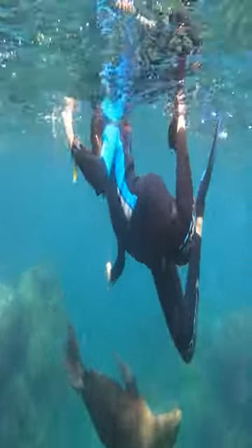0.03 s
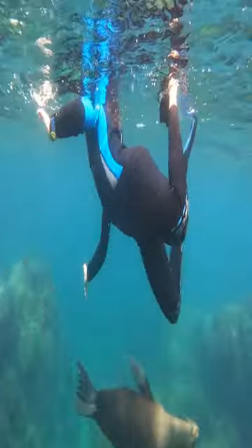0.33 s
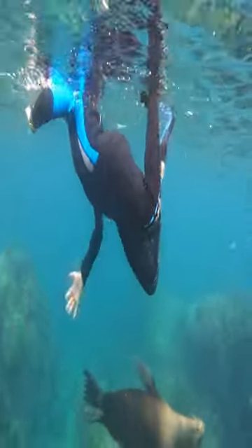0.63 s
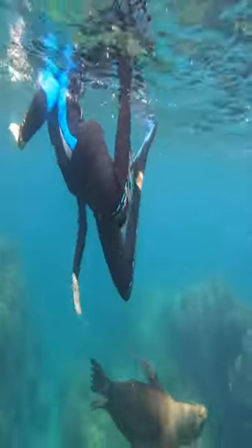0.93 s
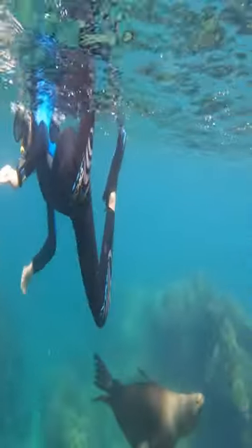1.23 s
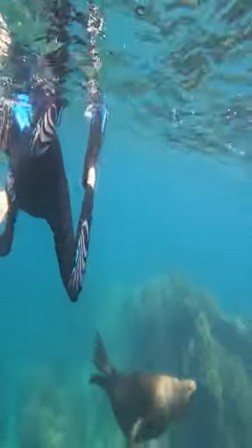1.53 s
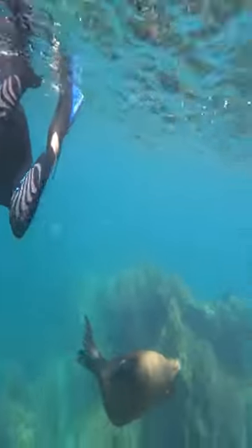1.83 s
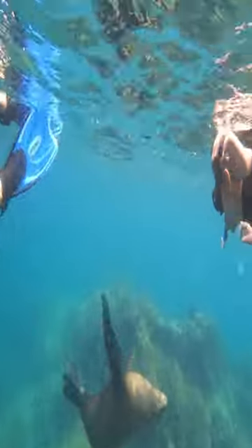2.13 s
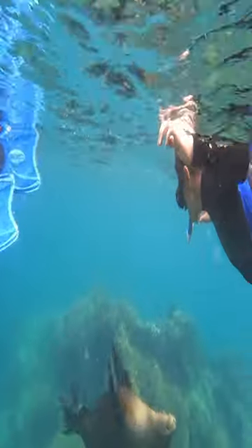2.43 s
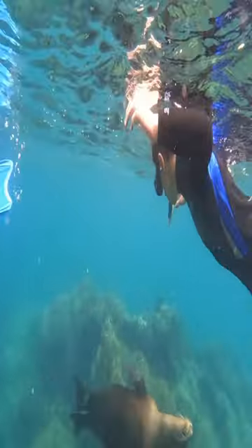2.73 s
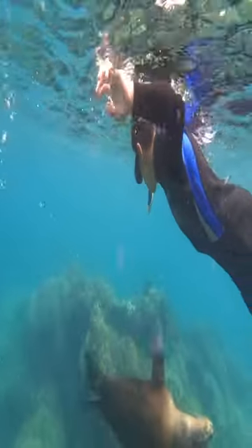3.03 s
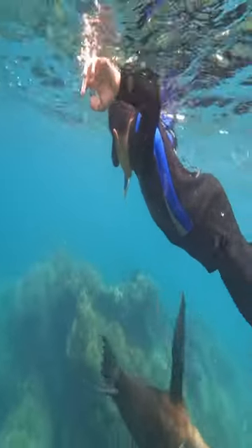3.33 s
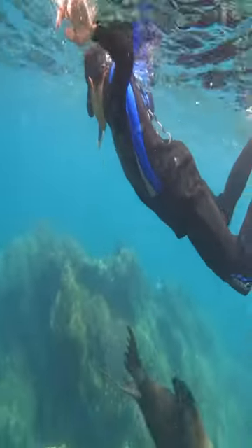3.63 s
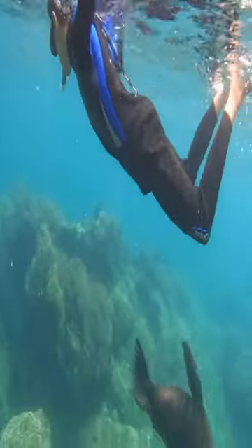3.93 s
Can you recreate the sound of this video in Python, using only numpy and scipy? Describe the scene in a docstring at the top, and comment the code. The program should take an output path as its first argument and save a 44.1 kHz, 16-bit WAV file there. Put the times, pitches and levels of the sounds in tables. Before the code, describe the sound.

Snapping shrimp crackle densely throughout, heard underwater through a waterproof case, each sharp click ringing very briefly. Water rumbles and gurgles softly underneath. Near 0.7 seconds come a soft gulp of air and tiny bubbles. From about 2 seconds, passing swimmers stir up more gurgling, small bubble streams and faint low thumps. Bubbling swells around 3.6 seconds, and the deep rumble is strongest just before 4 seconds.

```python
"""A camera in a waterproof case drifts just under the sea surface above a rocky reef.
From the start, snapping shrimp crackle all around, each snap ringing briefly in the case,
while water sways and gurgles against it. Near 0.7 s trapped air gulps softly and tiny bubbles sing.
From about 2 s, passing swimmers stir the water more, and their hands and fins drag streams of
bubbles under. The water pushes hardest just before the end, at 4 s."""
import sys
import numpy as np
from scipy import signal
from scipy.fft import rfft, irfft, next_fast_len
from scipy.io import wavfile

SR = 44100
rng = np.random.default_rng(int(sys.argv[2]) if len(sys.argv) > 2 else 0)


def unload_audio(sound):
    """Save the sound as a 16-bit wav file, at the path given as the first command line argument."""
    columns = np.transpose(np.atleast_2d(sound))
    # keep every value between -1 and 1, then stretch to whole-number steps
    steps = np.round(np.clip(columns, -1, 1) * 32767)
    wavfile.write(sys.argv[1], SR, steps.astype(np.int16))


N = 176400

# Snaps of nearby shrimp, before the case colours them: start_s, level_db, extra_body_db, extra_edge_db
NEAR_SNAPS = [(0.0082, -29, 14.5, 0), (0.0769, -23, 0, -1), (0.0926, -30.5, -12, -3),
              (0.1491, -32, -0.5, -16), (0.1922, -23.5, -5.5, 0), (0.1979, -28, -7, 4),
              (0.215, -31.5, 2.5, 5), (0.244, -32.5, 9, 9.5), (0.309, -27, -13, -15), (0.355, -28, 5, -4),
              (0.3575, -25, -4, -21), (0.4226, -33.5, 1, -17), (0.427, -26.5, 4, -9.5),
              (0.4971, -28, -3, 6), (0.508, -31.5, 1, 7), (0.5252, -27, -4, -4),
              (0.5644, -24.5, -0.5, -4.5), (0.5708, -23.5, -17, -15), (0.5965, -26.5, -8.5, 5),
              (0.6344, -24.5, -2, -11), (0.6428, -24.5, -2, -20), (0.6665, -27.5, -3, -11),
              (0.6755, -25.5, -4, -5), (0.7623, -29, -2.5, -4), (0.7706, -31.5, -1, 10),
              (0.8185, -23.5, -7.5, -7), (0.9324, -32.5, 5, 8.5), (0.9698, -28, -18, -8),
              (0.9777, -30, -1.5, 5.5), (1.0, -23.5, 3, 1), (1.0439, -23, -10, -17),
              (1.0535, -20, -13, -18), (1.0694, -23, 0.5, 1), (1.081, -23, -6, -21),
              (1.1084, -18.5, -9, -15), (1.1839, -22, 5, -1.5), (1.1894, -20.5, -2.5, -2),
              (1.2076, -20, -6, -14), (1.2242, -27, -7, -6), (1.2718, -22.5, -36, -27),
              (1.3313, -35, 7.5, 2), (1.3566, -24, -16, -8), (1.3715, -28, 0, 4), (1.3851, -22.5, -4, -7),
              (1.4022, -24.5, -6.5, -17), (1.4096, -19, -7, -11), (1.4574, -26, -13, -7),
              (1.4698, -19, -1.5, -1), (1.4804, -30, 12.5, -3), (1.5193, -25, 6, -0.5),
              (1.5506, -20, -11, -19), (1.559, -20, -5, -7), (1.5653, -27.5, 10, 8), (1.5764, -23.5, 8, 0),
              (1.6407, -31, 7.5, -9), (1.6522, -22.5, -1.5, -6), (1.6555, -31.5, 7.5, 10),
              (1.6583, -30.5, 3, -7), (1.6724, -25.5, -33, -3), (1.686, -23.5, 5.5, 1.5),
              (1.712, -23, 3.5, -4), (1.7657, -36, 11, -3), (1.7835, -29, -1, 0), (1.7941, -28.5, 3, 8),
              (1.8183, -19, -4.5, -15), (1.8296, -24, 5, 0.5), (1.838, -22, -9.5, -12),
              (1.8878, -27, -3, -12), (1.931, -20.5, 0.5, -9), (1.9937, -23, -18, -11),
              (2.0103, -22, -1, -2.5), (2.0262, -21.5, -9.5, -8), (2.0379, -16.5, -24, -14),
              (2.085, -20.5, -28, -7.5), (2.1411, -36, 11, -15), (2.1996, -28.5, 3, -5),
              (2.2103, -22.5, -1, -4.5), (2.2472, -34.5, 3.5, 5.5), (2.316, -25.5, -5.5, -1.5),
              (2.319, -31.5, -8, -13), (2.3233, -24, -1.5, -12), (2.3607, -26.5, -5, 1),
              (2.3753, -18.5, -18, -12), (2.4292, -24, -26, -11), (2.4833, -26, -3.5, 2.5),
              (2.5249, -27, -7, 4.5), (2.532, -23.5, -8, -5), (2.57, -24.5, 5.5, -8),
              (2.5949, -20, 1, -4.5), (2.6674, -23, -20, -2), (2.674, -40, -13, 6),
              (2.6844, -26, -0.5, -0.5), (2.6878, -31.5, 6.5, -5), (2.7406, -29, -3, 7.5),
              (2.7652, -26, 4.5, 7), (2.793, -17, -5, -26), (2.8019, -20, -2.5, -10.5),
              (2.8563, -22, -1, -2), (2.8861, -24.5, -6.5, -5), (2.9119, -25.5, 5, -6),
              (2.945, -35.5, 8.5, -1), (2.9555, -21, -3.5, -4), (3.0372, -28.5, -4.5, -12),
              (3.1256, -23, -3, -11), (3.1488, -39.5, -4, 16), (3.1764, -22, -5, 1.5),
              (3.321, -22.5, -7, -31), (3.36, -27.5, -4, 0), (3.377, -28.5, 13.5, -0.5),
              (3.5159, -29, -2, 0), (3.5346, -34.5, 1, 3), (3.548, -25, 1, -3.5), (3.61, -28, -1, -3),
              (3.6216, -27.5, 9, 1), (3.6275, -26.5, -3, 7), (3.6448, -32, 2, 0), (3.653, -30, 8, 5.5),
              (3.666, -25.5, -6, -7), (3.7143, -28, -4.5, 0.5), (3.7661, -40, 13.5, 4), (3.7857, -32, 3, 3),
              (3.8089, -26.5, 12.5, 0.5), (3.8367, -20.5, -11, -28), (3.8755, -21.5, -11.5, -12),
              (3.9187, -28, 0.5, -4), (3.948, -21.5, -11.5, -29), (3.9791, -26.5, 4, -2),
              (3.9854, -30.5, 13, 4)]
# How the far shrimp grow louder: time_s, gain_db
CROWD_GAIN = [(.7, -1.5), (2.3, 0.5)]
# Tones the case rings at: pitch_hz, width_hz, gain_db, left_over_right_db, left_lead_radians
CASE_TONES = [(660, 120, -17, -3.5, 0.9), (1099, 97, -15, -23.5, -2.8), (1385, 124, 1, 5.5, -0.86),
              (1598, 225, 7, -1.5, 0.44), (1836, 460, -8.5, 24, -2.8), (2554, 646, 8, 1.5, -0.85),
              (3903, 512, 8, 2, 0.81), (4920, 650, 6.5, -4, -0.16), (6003, 250, -1, -3.5, -0.68),
              (6785, 1250, 0, -1, 0.31), (11400, 7800, -23, -1, -0.3)]
# How much of the crackle differs between the two microphones: frequency_hz, share_0_to_1
STEREO_SHARE = [(700, 0.67), (1200, 0.08), (5000, 0.02), (9000, 0.16), (14000, 0.22)]
# Water pushing on the case, before SWAY_BOOST_DB is added: time_s, level_db
SWAY_LEVEL = [(.55, -48.5), (.7, -46.5), (1.6, -49.5), (2.2, -39.5), (3.45, -40), (3.75, -41),
              (3.88, -27.5)]
# The deep tone of that push: frequency_hz, gain_db
SWAY_COLOUR = [(5, -19.5), (10, 3.5), (35, -15), (60, -22.5), (100, -46), (200, -75), (1000, -110)]
# Loudness of the gurgling water: time_s, level_db
GURGLE_LEVEL = [(0, -56), (.6, -53.5), (1.1, -54.5), (1.95, -61.5), (2.3, -47.5), (2.6, -52.5), (3.0, -56),
                (3.35, -52), (3.6, -47), (3.85, -47.5), (4, -51)]
# Balance of low and high in the gurgle: frequency_hz, gain_db
GURGLE_COLOUR = [(50, 9.5), (100, -3), (170, 2.5), (290, -8), (450, -16.5), (700, -21.5), (1000, -58),
                 (2000, -24)]
# Loudness of the small bubbles that swimmers stir up: time_s, level_db
BUBBLE_LEVEL = [(0, -70), (.7, -48.5), (1.5, -70), (2.1, -60), (2.3, -54.5), (2.7, -63), (3.1, -55),
                (3.42, -58), (3.7, -45.5), (4, -54.5)]
# How strong those bubbles are compared with each other: pitch_hz, gain_db
BUBBLE_STRENGTH = [(170, -3), (280, -6.5), (570, -8.5), (850, -14), (1150, -13), (1550, 15.5), (1900, 19)]
# Gulps of trapped air: start_s, pitch_hz, peak_db, time_to_peak_s
AIR_GULPS = [(0.626, 447, -30.5, 0.001), (.665, 35.2, -29, 0.0058), (.735, 90, -40, 0.0087),
             (0.877, 175, -37.5, 0.0098), (1.3318, 1443, -19.5, 0.0015), (2.049, 90, -40, 0.017),
             (2.165, 165, -26, 0.0018), (2.171, 367, -39.5, 0.012), (2.186, 144, -24, 0.0032),
             (2.190, 248, -29, 0.0035), (3.150, 208, -44.5, 0.0095), (3.256, 87.5, -35, 0.01),
             (3.380, 244, -38, 0.0055), (3.560, 49.4, -19.5, 0.0046), (3.564, 260, -39, 0.0019),
             (3.572, 99, -32, 0.0075), (3.855, 88, -30, 0.011)]
# Bubble streams dragged under by hands and fins: start_s, length_s, pitch_hz, level_db
BUBBLE_STREAMS = [(2.268, .07, 1085, -55), (2.69, .07, 216, -51.5), (2.964, 0.18, 1620, -45.5),
                  (3.018, 0.084, 567, -61), (3.367, 0.083, 275, -49), (3.456, 0.35, 265, -51),
                  (3.56, 0.059, 565, -58)]
# The body, middle, edge and tip of a snap's sound: low_hz, high_hz
SNAP_BANDS = [(1200, 3200), (3200, 5600), (5600, 9000), (9000, 16000)]

CLUSTER_DB, CLUSTER_PEAK_S, CLUSTER_FADE_S = -16, .00055, .00053
REEF_TAIL_DB, REEF_FADE_S = -23, .0035
ECHO_DB, ECHO_RANGE_DB, ECHO_LATEST_S = -13, 8, .016
FAR_SNAPS_PER_S, FAR_DB, HISS_DB = 200, -34.5, -44.5
SWAY_BOOST_DB = 7


def from_db(db):
    """Turn decibels into a number to multiply by."""
    return 10 ** (np.asarray(db) / 20)


def unit_level(x):
    """Scale each row so its average (rms) level is 1."""
    return x / np.sqrt(np.mean(x ** 2, axis=-1, keepdims=True) + 1e-20)


def over_time(rows):
    """Join (time, value) points into a value for every sample."""
    return np.interp(np.arange(N) / SR, *np.transpose(rows))


def at_hz(points, hz):
    """Read between (frequency, value) points, with octaves evenly spaced."""
    f, value = np.transpose(points)
    return np.interp(np.log(np.maximum(hz, 1)), np.log(f), value)


def cut(x, hz, kind, order=2):
    """Keep only the chosen range of frequencies."""
    return signal.sosfilt(signal.butter(order, hz, kind, fs=SR, output="sos"), x)


def drift(hz, step=40):
    """A smooth random wobble, about 1 in size."""
    memory = np.exp(-2 * np.pi * hz * step / SR)
    noise = rng.standard_normal(N // step + 2002)
    slow = signal.lfilter([1], [1, -2 * memory, memory * memory], noise)[2000:]
    return np.interp(np.arange(N) / step, np.arange(len(slow)), unit_level(slow))


def quickest_filter(gain, size):
    """The fastest-responding filter with this gain at each frequency."""
    cepstrum = irfft(np.log(gain + 1e-9), size)
    cepstrum[1:size // 2] *= 2
    cepstrum[size // 2 + 1:] = 0
    return np.exp(rfft(cepstrum))


def add(track, start_s, sound):
    """Mix a sound in at its start time."""
    i = int(np.clip(start_s * SR, 0, N - 1))
    track[i:i + len(sound)] += sound[:N - i]


def snaps(rows, tip_db=-2, tip_spread_db=3, size=512):
    """Each snap is a sharp click, a tight cluster of later arrivals and a faint tail from the reef."""
    starts, db, body_db, edge_db = np.transpose(rows)
    t = (np.arange(size) - 10) / SR
    cluster = from_db(CLUSTER_DB) * np.exp(-abs(t - CLUSTER_PEAK_S) / CLUSTER_FADE_S)
    tail = from_db(REEF_TAIL_DB) * np.exp(-t / REEF_FADE_S)
    noise = rng.standard_normal((len(starts), size))
    spectra = rfft((t == 0) + noise * (cluster + tail) * (t > 0))
    # Set four bands to give each snap its own tone.
    f = np.arange(size // 2 + 1) * SR / size
    sparkle_db = tip_db + edge_db / 2 + tip_spread_db * rng.standard_normal(len(starts))
    wanted_db = np.array([db + body_db, db, db + edge_db, db + sparkle_db])
    power = [np.mean(abs(spectra[:, (f > low) & (f < high)]) ** 2, axis=1) for low, high in SNAP_BANDS]
    gains_db = wanted_db - 10 * np.log10(power) + 10 * np.log10(size)
    centres_hz = np.mean(SNAP_BANDS, axis=1)
    out = np.zeros(N)
    for start_s, spectrum, gain_db in zip(starts, spectra, gains_db.T):
        add(out, start_s, irfft(spectrum * from_db(np.interp(f, centres_hz, gain_db))))
    return out


def shrimp(farthest=5.5, tone_spread_db=2):
    """Near snaps echo once off surface or rocks; far ones are fainter, and the farthest blur into hiss."""
    lag, loss = rng.random((len(NEAR_SNAPS), 2)).T
    echoes = np.array(NEAR_SNAPS)
    echoes[:, 0] += ECHO_LATEST_S * lag
    echoes[:, 1] += ECHO_DB - ECHO_RANGE_DB * loss
    count = int(FAR_SNAPS_PER_S * N / SR)
    when, where = rng.random((count, 2)).T
    distance = 1 + (farthest - 1) * where  # the closest of the far shrimp is at 1
    body_db, edge_db = tone_spread_db * rng.standard_normal((count, 2)).T
    far = np.transpose([when * N / SR, FAR_DB - 20 * np.log10(distance), body_db - 1, edge_db + 1.5])
    paths = []
    for _ in range(2):  # the sound arrives by two sets of paths
        near = snaps(NEAR_SNAPS, tip_db=-1.5) + snaps(echoes)
        crowd = snaps(far) + from_db(HISS_DB) * rng.standard_normal(N)
        paths.append(near + crowd * from_db(over_time(CROWD_GAIN)))
    return np.array(paths)


def ringing_case(pressure, dull_above_hz=12400):
    """The case rings at broad tones; each reaches the two microphones with its own balance and timing."""
    size = 2 * next_fast_len(N // 2 + SR // 20)
    f = np.maximum(np.arange(size // 2 + 1) * SR / size, 1)
    sides = np.array([[1], [-1]])  # left, right
    shared, differing = rfft(pressure, size)
    share = np.clip(at_hz(STEREO_SHARE, f), 0, 1)
    arriving = np.sqrt(1 - share) * shared + np.sqrt(share) * differing * sides
    tones = 0
    for hz, width_hz, db, pan_db, lead in CASE_TONES:
        at_microphones = from_db(db + sides * pan_db / 2) * np.exp(.5j * sides * lead)
        tones += at_microphones / (1 + (hz / width_hz * (f / hz - hz / f)) ** 2)
    gain = abs(tones).mean(axis=0)
    ringing = irfft(arriving * tones / gain * quickest_filter(gain, size), size)[:, :N]
    return cut(ringing, dull_above_hz, "low", order=4)


def sway(side_db=-17):
    """Water pushes slowly back and forth on the case, making a deep rumble."""
    f = np.arange(N // 2 + 1) * SR / N
    spectrum = rfft(rng.standard_normal((2, N))) * from_db(at_hz(SWAY_COLOUR, f))
    middle, side = unit_level(irfft(spectrum, N))
    stereo = middle + from_db(side_db) * side * [[1], [-1]]
    return stereo * from_db(over_time(SWAY_LEVEL) + SWAY_BOOST_DB)


def gurgle(bands=11, side_db=-18, flicker_db=4, flicker_hz=12.8):
    """Stirred water gurgles: narrow bands of noise swell and fade on their own."""
    out, edges_hz = 0, np.geomspace(50, 2000, bands + 1)
    for low, high in zip(edges_hz, edges_hz[1:]):
        middle, side = cut(rng.standard_normal((2, N)), [low, high], "band")
        gain = from_db(at_hz(GURGLE_COLOUR, np.sqrt(low * high)) + flicker_db * drift(flicker_hz))
        out += gain * (middle + from_db(side_db) * side * [[1], [-1]])
    return unit_level(out) * from_db(over_time(GURGLE_LEVEL))


def bubble_cloud(per_s=320, spread_db=1, cycles_to_peak=3.4):
    """Swimmers stir the surface close by, and small bubbles sing at random pitches."""
    count = int(per_s * N / SR)
    when, pitch = rng.random((count, 2)).T
    lowest, highest = BUBBLE_STRENGTH[0][0], BUBBLE_STRENGTH[-1][0]
    hz = lowest * (highest / lowest) ** pitch
    db = at_hz(BUBBLE_STRENGTH, hz) + spread_db * rng.standard_normal(count)
    cloud = air_pockets(zip(when * N / SR, hz, db, cycles_to_peak / hz))
    return unit_level(cloud) * from_db(over_time(BUBBLE_LEVEL))


def air_pockets(rows, rise_share_per_s=.85):
    """Each pocket of air rings: its note swells, rises a little in pitch and dies away."""
    out = np.zeros(N)
    for start_s, hz, db, peak_s in rows:
        t = np.arange(int(10 * peak_s * SR)) / SR
        swell = t / peak_s * np.exp(1 - t / peak_s)
        note = np.sin(2 * np.pi * hz * t * (1 + rise_share_per_s * t / 2))
        add(out, start_s, from_db(db) * swell * note)
    return out


def bubble_streams(count=24, rise_share=.065, spread_share=.069, cycles_to_peak=2.74):
    """Bubbles of nearly one size follow closely and merge into a wavering, slightly rising note."""
    out = np.zeros(N)
    for start_s, length_s, hz, db in BUBBLE_STREAMS:
        along = (np.arange(count) + rng.random(count)) / count
        pitch_hz = hz * np.exp(rise_share * (along - .5) + spread_share * rng.standard_normal(count))
        swell_db = 10 * np.log10(np.sin(np.pi * along) + 1e-9)
        stream = air_pockets(zip(start_s + length_s * along, pitch_hz, swell_db, cycles_to_peak / pitch_hz))
        out += from_db(db) * unit_level(stream) * np.sqrt(length_s * SR / N)
    return out


def scene():
    """Shrimp heard through the case, over moving water and bubbles."""
    crackle = ringing_case(shrimp())
    return crackle + sway() + gurgle() + bubble_cloud() + air_pockets(AIR_GULPS) + bubble_streams()


def record(dry, cutoff_hz=16300):
    """The very highest treble is cut off steeply."""
    return signal.sosfilt(signal.ellip(10, .1, 80, cutoff_hz, fs=SR, output="sos"), dry)


dry = scene()
out = record(dry)
unload_audio(out)
```